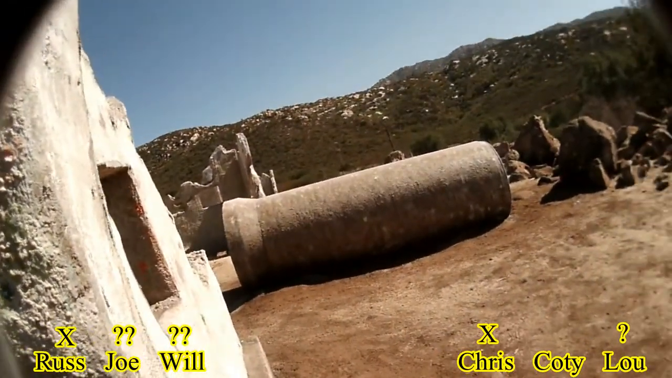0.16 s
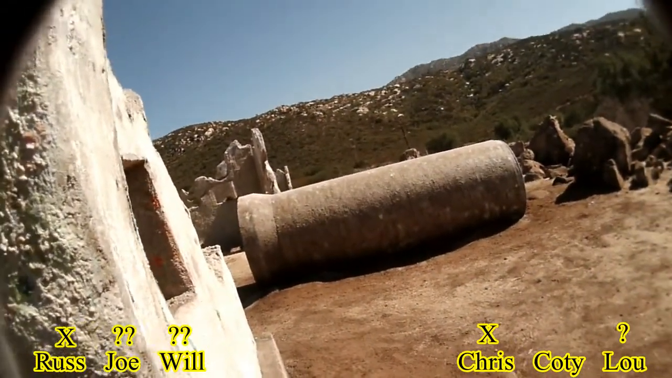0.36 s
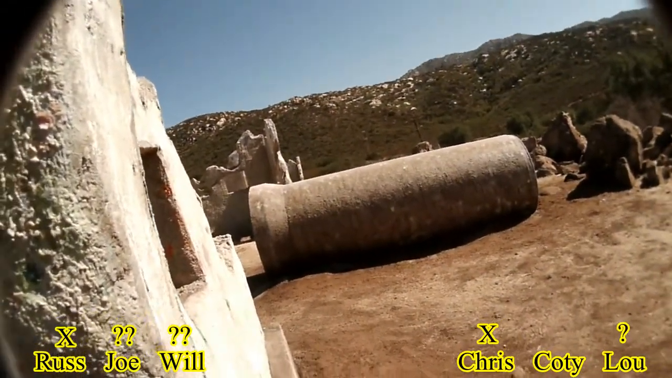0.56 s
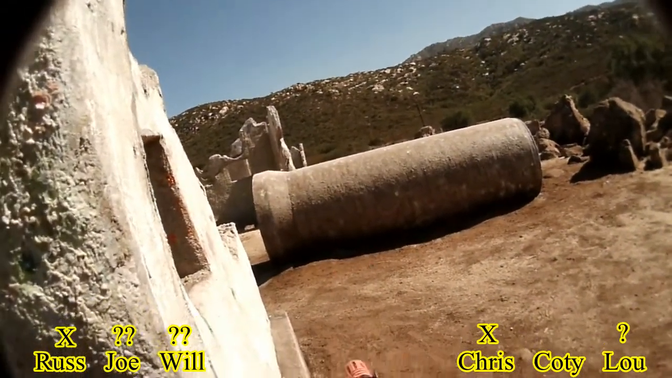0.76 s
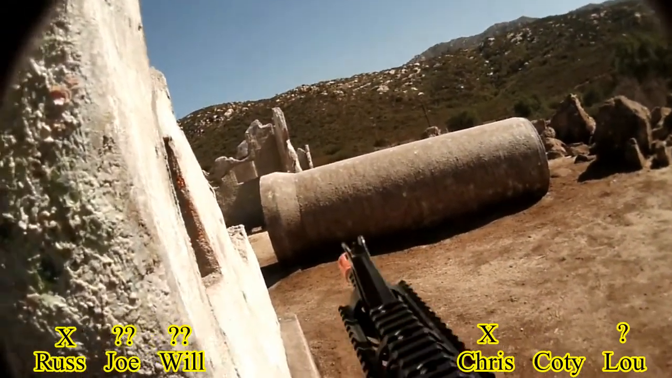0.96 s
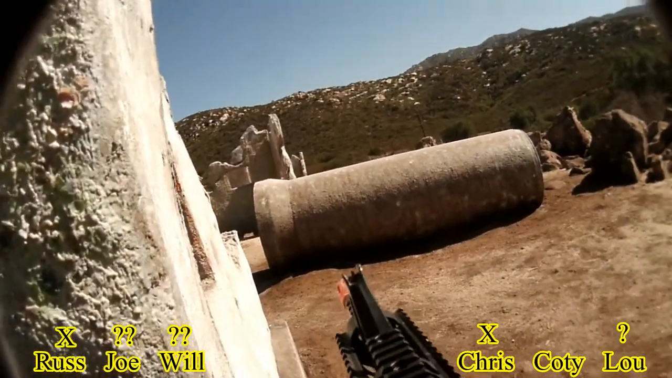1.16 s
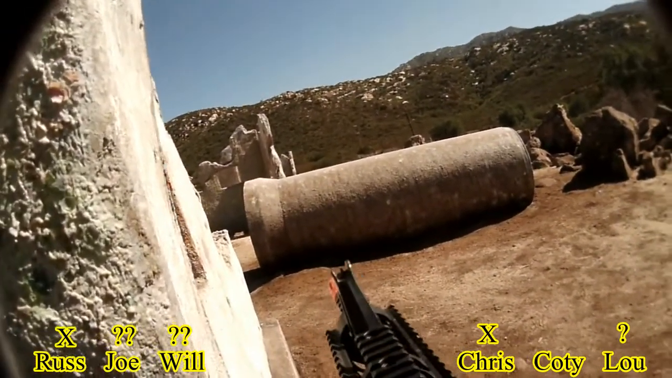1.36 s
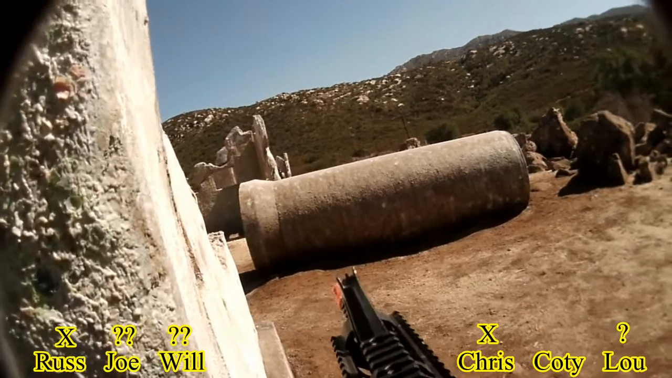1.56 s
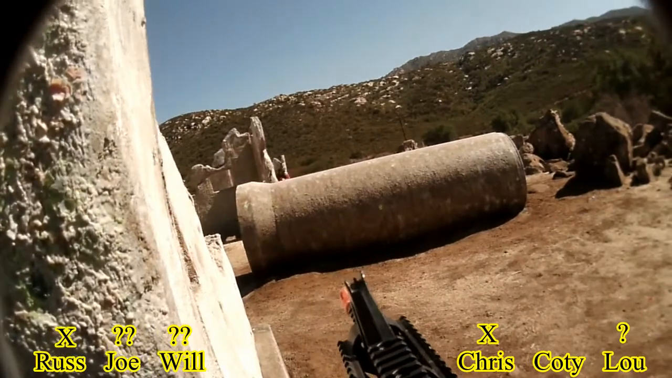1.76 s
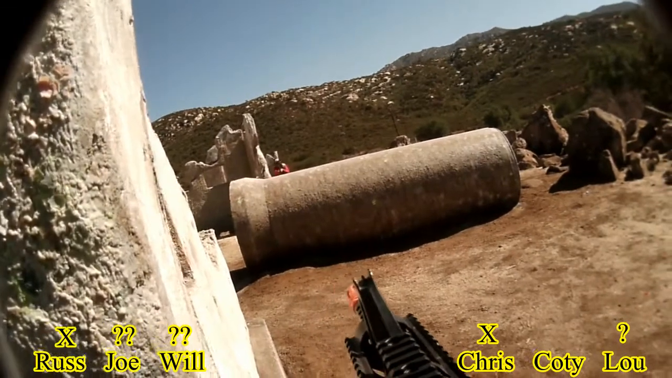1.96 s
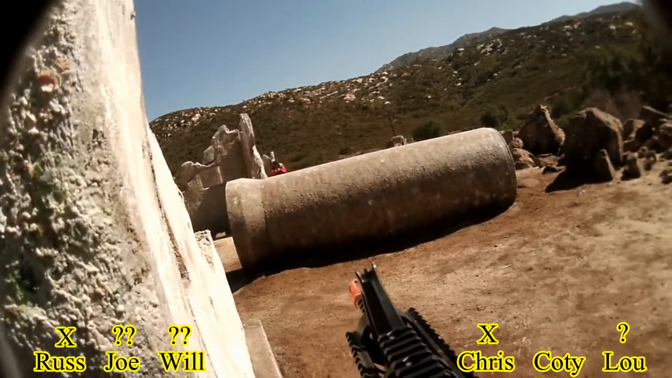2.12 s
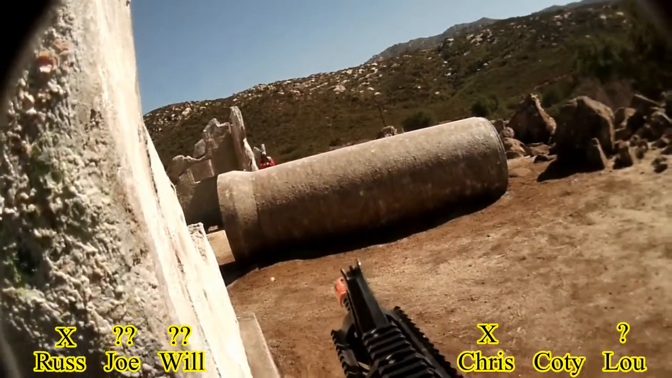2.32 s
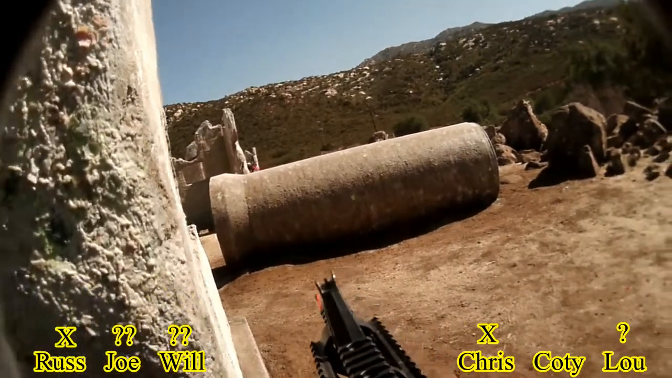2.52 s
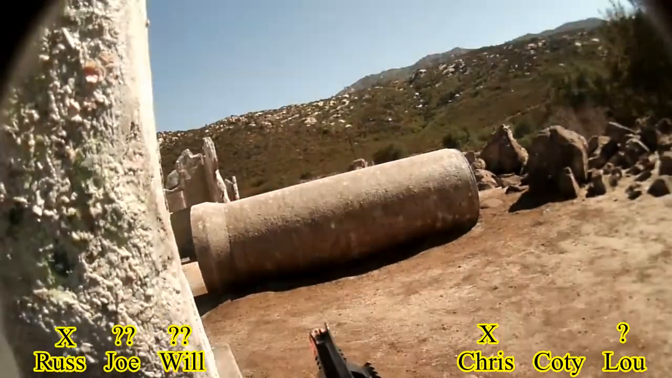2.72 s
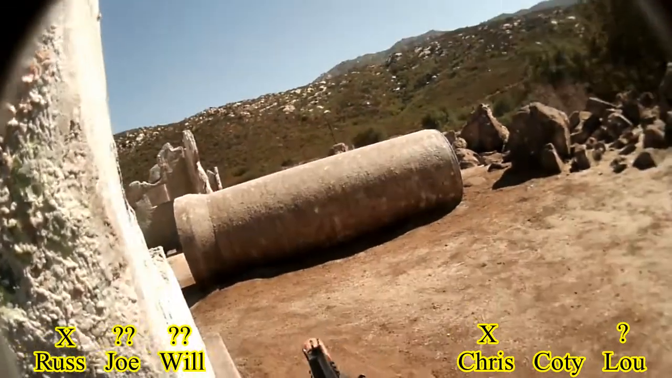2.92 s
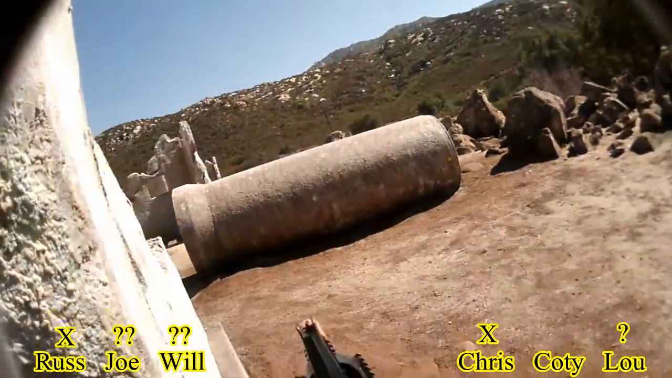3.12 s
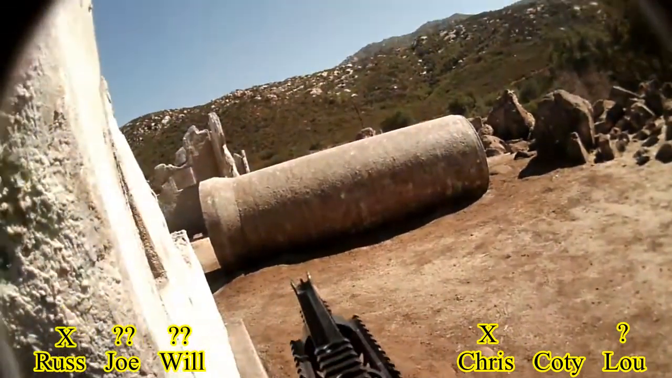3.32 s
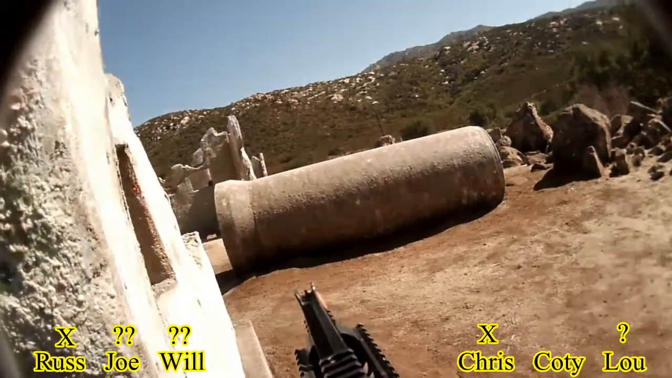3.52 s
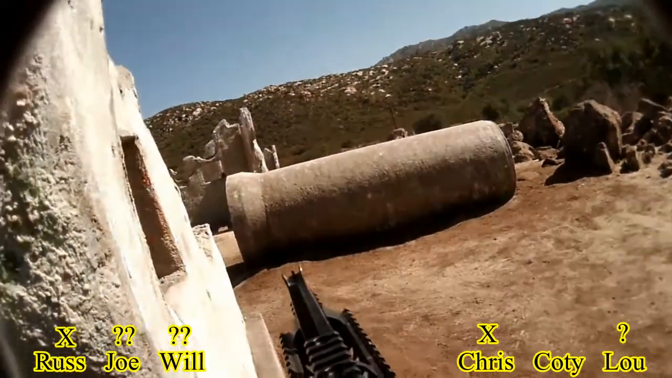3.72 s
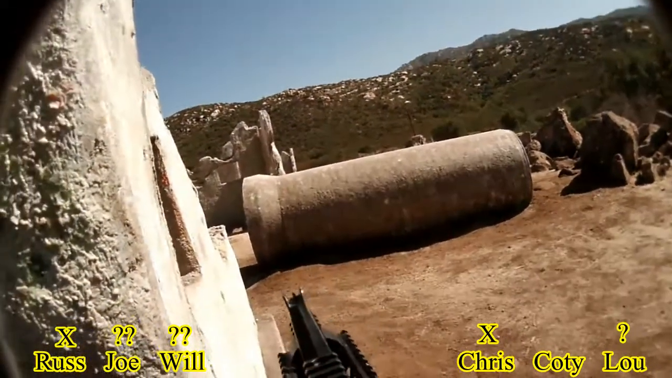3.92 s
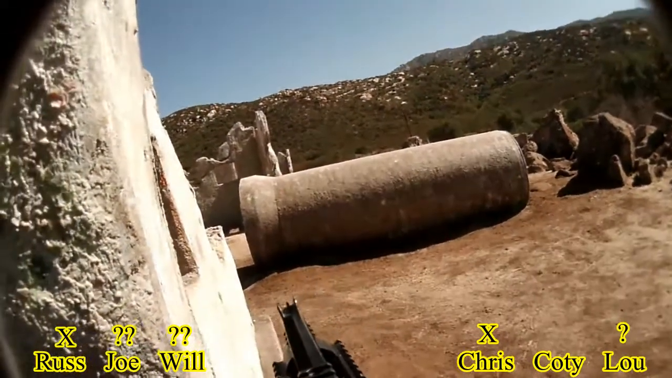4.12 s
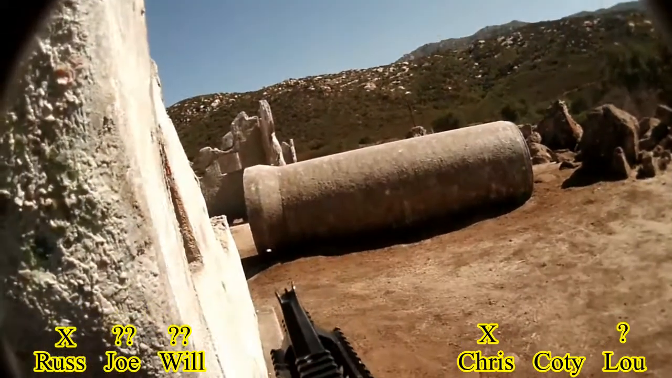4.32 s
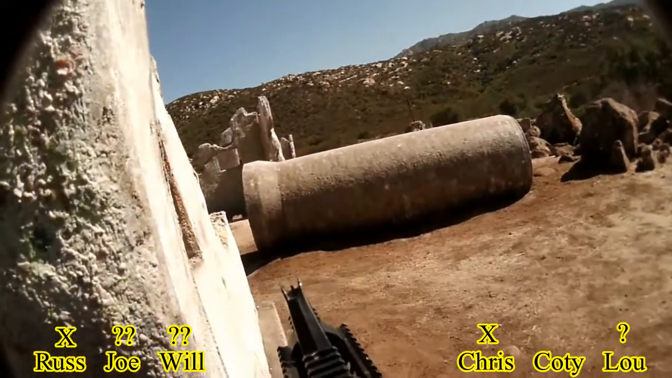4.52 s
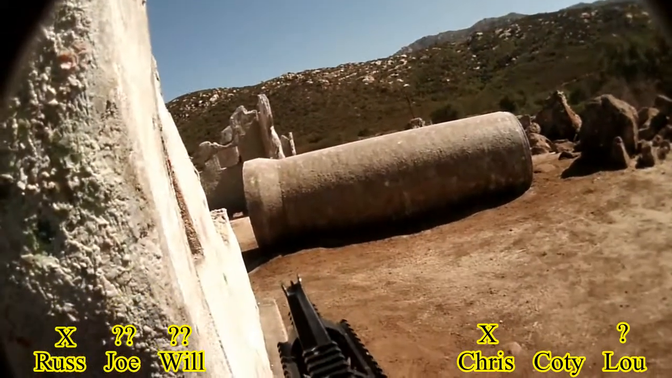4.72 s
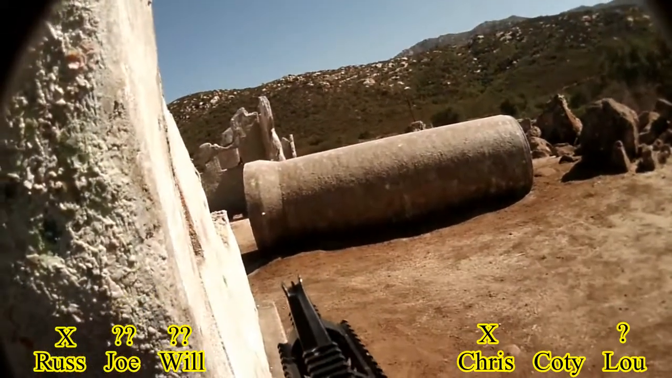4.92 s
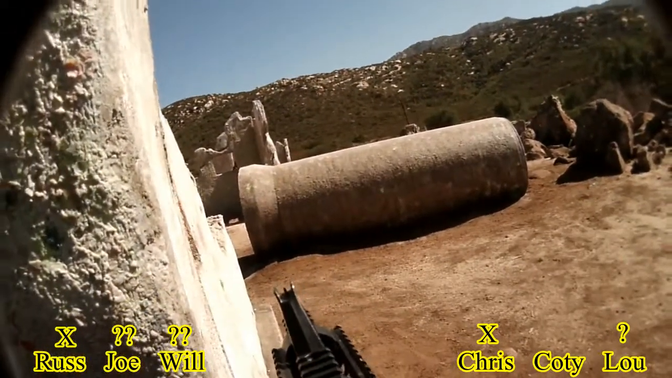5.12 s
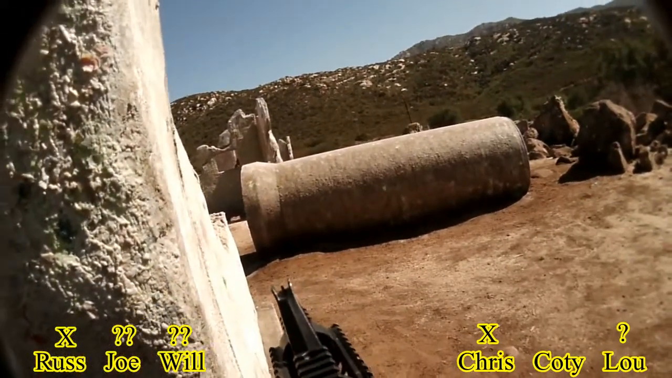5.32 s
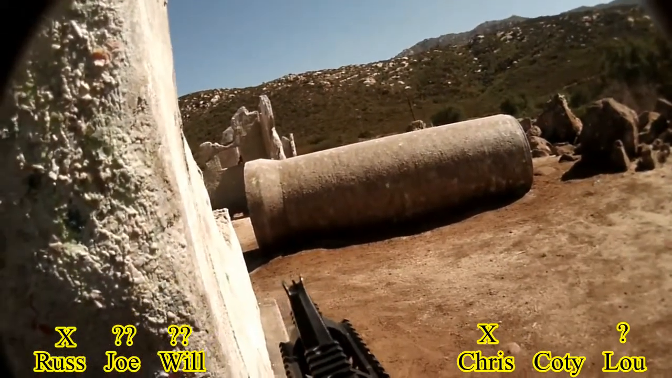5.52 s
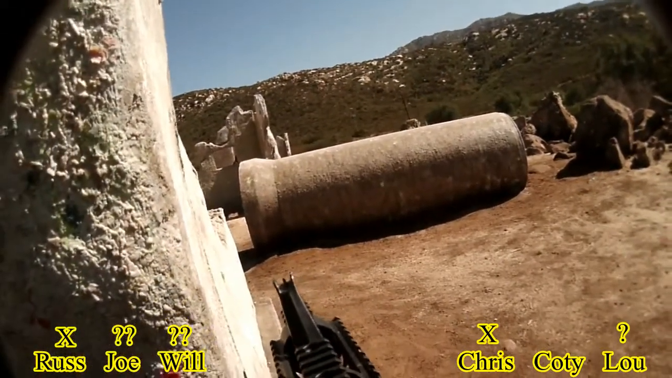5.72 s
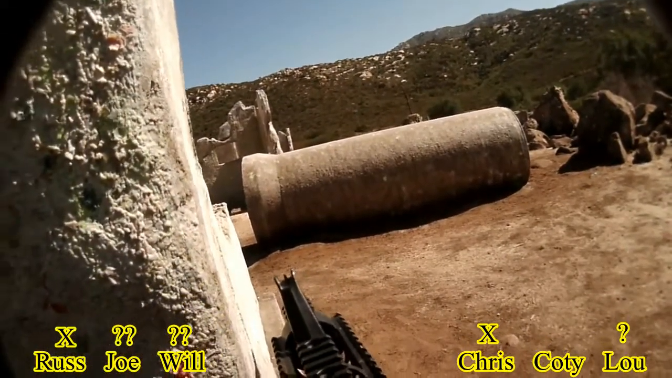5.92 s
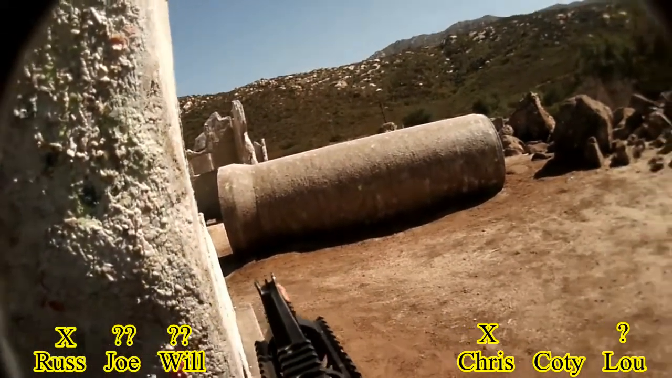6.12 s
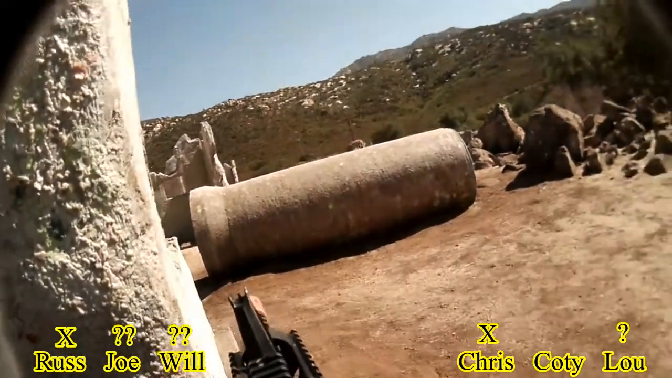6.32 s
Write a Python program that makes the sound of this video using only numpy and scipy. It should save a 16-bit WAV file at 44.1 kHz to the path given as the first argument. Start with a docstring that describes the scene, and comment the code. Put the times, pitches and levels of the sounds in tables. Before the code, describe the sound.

A quiet open field: light wind rumbles on the microphone over faint hiss and a low, distant hum. Clothing rustles softly, with small kit taps around 0.7 and 1.1 seconds. At 1.7 seconds an electric airsoft rifle, very close, fires nine rapid automatic shots, winding down by 2.4 seconds. Each shot is a hard, slightly overloaded piston slam with an air pop, whining, rattling gears and a bright metallic clack. Soft rustling and dull bumps follow from 2.5 to 3.6 seconds. Two-shot bursts come at about 3.8 and 4.2 seconds, then four-shot bursts at 4.8 and 5.4 seconds. Each starts with a brief motor whir and ends with a knock as the gears settle. A light click falls at 5.2 seconds. After 5.8 seconds there are only small clicks, rustling cloth and a bump near 6.1 seconds over the breeze.

```python
"""An open field in a light breeze, a small camera's microphone right beside an electric airsoft rifle.
The rifle fires five automatic bursts. In each cycle whining gears draw the spring, the piston slips
free, pushes its air and slams home, and a metal part clacks back. This close, the slams overload the
microphone. Between bursts the shooter's kit rustles and bumps over wind rumble, hiss and a far hum."""
import sys
import numpy as np
from scipy import signal
from scipy.fft import rfft, irfft, next_fast_len
from scipy.io import wavfile
from scipy.ndimage import uniform_filter1d

SR = 44100
rng = np.random.default_rng(int(sys.argv[2]) if len(sys.argv) > 2 else 0)


def int16_out(signal):
    """Quantize to a 16-bit WAV file."""
    q = np.round(np.clip(np.atleast_2d(signal).T, -1, 1) * 32767)
    wavfile.write(sys.argv[1], SR, q.astype(np.int16))


N = 280766
TIME = np.arange(N) / SR
AGE = np.arange(SR // 10) / SR  # time since a blow [s]

# hiss of open country: (frequency [Hz], relative level [dB])
FIELD_SPECTRUM = [(120, -26), (200, -11), (268, -10), (353, -18), (558, -11), (601, -15.5), (722, -11),
                  (1500, -23.5), (2860, -22), (3560, -26), (8270, -29.5), (13600, -33.5), (16000, -43)]
# wind on the microphone: (frequency [Hz], relative level [dB])
BREEZE_SPECTRUM = [(12, -38), (20, 3.5), (37, 0), (54, -5.5), (80, 0), (107, -3), (134, -1), (166, -10),
                   (268, -12), (348, -17.5), (400, -19.5), (520, -37), (880, -120)]
# strength of the breeze: (time [s], relative level [dB])
GUSTS = [(0, -54), (.9, -49.5), (1.5, -47.5), (2.4, -40), (3.5, -43), (4.05, -43.5), (4.5, -39.5),
         (4.8, -47), (5.3, -45.5), (5.9, -41), (6.37, -46.5)]
# low hum in the distance: (frequency [Hz], level [dB])
HUM_TONES = [(81, -56.5), (138, -63.5)]
# rubbing cloth: (frequency [Hz], relative level [dB])
CLOTH_SPECTRUM = [(150, -20), (450, 1), (750, 6), (1300, -14), (1700, -14), (2400, -11), (3000, -11),
                  (3700, -21.5), (9000, -37), (16000, -45)]
# the shooter's movements: (start [s], length [s], level [dB])
CLOTH_MOVES = [(0.062, 0.17, -49), (0.556, 0.48, -52.5), (2.425, 0.74, -57), (5.815, 0.58, -55),
               (6.082, .06, -44)]
# taps and bumps of rifle and kit: (time [s], level [dB], pitch [Hz], treble [dB], t60 [s])
KIT_BUMPS = [(0.122, -44, 420, 0, .04), (.693, -29, 700, 7.5, 0.026), (1.090, -33.5, 744, -12, 0.029),
             (2.516, -30.5, 216, -6, .056), (2.745, -40.5, 608, 3, 0.053), (3.378, -25, 190, -4, 0.059),
             (3.583, -29, 130.5, -6, 0.0707), (3.623, -28.5, 120, 2, 0.09), (4.455, -32, 248.6, -4, .056),
             (6.121, -25, 574, -22, 0.054)]
# light clicks of trigger and fittings: (time [s], relative level [dB], treble [dB])
FITTING_CLICKS = [(5.228, -23.5, 3), (5.2370, -22.5, -2), (5.832, -31, 23), (6.044, -34, 8),
                  (6.1430, -33, 7)]
# trigger pulls: (gears engage [s], run-up before it [s], first load [dB], motor cut [s],
# run-down after it [s], relative clack level [dB], gears fall back [s])
TRIGGER_PULLS = [(1.6769, .002, -12, 2.340, .07, -1, 2.429),
                 (3.6896, .002, -10.5, 3.923, .028, 1.6, 3.9729),
                 (4.1170, .002, -20, 4.339, 0.037, 1.5, 4.3830),
                 (4.7052, .002, -19.5, 5.010, 0.095, 1.2, 5.1307),
                 (5.3368, .032, -3.5, 5.718, 0.028, 0.4, 5.7647)]
# knocks as the gears engage and fall back, a row for each pull: (relative engage level [dB],
# its treble [dB], relative fall-back level [dB], its treble [dB], pawl tick's lead [s])
PULL_KNOCKS = [(-20, -5, -3.5, -5, .014), (-11, -0.5, -1, -3.5, .013), (-19, 3, -1, -2, .013),
               (-12, -0.5, -10.5, 15, .014), (-4.5, 1.5, 0, -5, .021)]
# the gears run free, catch the piston, slow as the spring tightens, and let go:
# (share of the cycle [0-1], tooth rate at full speed [Hz], relative load [dB])
GEAR_CYCLE = [(0, 819, -2.5), (.2, 870, -4), (.28, 892.5, -3), (.62, 819.2, 0.5), (.82, 735, -1.5),
              (.9, 699.9, -7.5), (1, 681.1, -7.5)]
# whine of the teeth: (multiple of the tooth rate [1], relative level [dB])
WHINE_HARMONICS = [(1, 4), (2, -13.5), (3, -10), (4, -17.5), (5, -36), (6, -26), (8, -19), (9, -21)]
# gear rattle through the shell: (frequency [Hz], relative level [dB])
RATTLE_SPECTRUM = [(90, -18), (380, -18.5), (600, 0.5), (780, 4), (1100, -4), (1500, -10), (2300, -7.5),
                   (2900, -.5), (3450, -16.5), (4600, -14), (5300, -27), (7000, -15.5), (9500, -29.5),
                   (12500, -26.5), (14000, -50)]
# contact noise of a knock: (frequency [Hz], relative level [dB])
KNOCK_SPECTRUM = [(100, -21), (400, -1.5), (750, 5.5), (1300, -3), (2200, -1), (2900, -1.5), (3600, -11.5),
                  (4500, -12.5), (5400, -20), (7500, -13.5), (10000, -23), (15000, -37)]
# chatter of metal on metal: (frequency [Hz], relative level [dB])
CLACK_SPECTRUM = [(200, -18), (800, 7), (1400, -3), (2900, -3.5), (3900, -5), (5300, -15), (6500, -7),
                  (8400, -8.5), (9700, -14.5), (12500, -10.5), (13800, -23.5), (16000, -29)]
# ringing metal of the action: (frequency [Hz], relative level [dB], t60 [s])
ACTION_MODES = [(783, 2.5, 0.046), (2244, 2.5, 0.057), (2826, 1.5, 0.058), (2948, 6.5, 0.044),
                (3870, -10.5, 0.094), (4640, -4, 0.06), (6260, -8.5, 0.064), (6530, -5, .06),
                (7100, -13, 0.017), (8230, -1.5, 0.061), (8730, -7.5, 0.092), (10520, -12, 0.058),
                (11230, -6.5, 0.029), (11460, -12, 0.074), (12000, -21, .07), (12300, -24, 0.054)]
# stock and barrel under the piston's blow: (frequency [Hz], relative level [dB], t60 [s])
BODY_MODES = [(391, 1, 0.015), (583.2, 2, 0.024), (633.7, -11.5, 0.06), (684.7, -6.5, 0.051),
              (955, 4.5, 0.015), (1075, -18.5, 0.085)]
# pop of air at the muzzle: (frequency [Hz], relative level [dB])
MUZZLE_SPECTRUM = [(300, -9), (1000, 8.5), (1900, 9), (3500, 1), (7000, -8), (11000, -29), (16000, -34)]
# piston slams: (time [s])
SLAM_TIMES = [1.6973, 1.7967, 1.8753, 1.9514, 2.0275, 2.1037, 2.1791, 2.2559, 2.332, 3.7846, 3.8747, 4.1896,
              4.2859, 4.7814, 4.877, 4.9573, 5.0444, 5.4209, 5.5065, 5.5866, 5.6657]

CYCLE_S = .076  # from shot to shot at full motor speed
REBOUND_S = .013  # the gears rebound once, this long after falling back


def undb(db):
    """Decibels to gain."""
    return 10 ** (np.asarray(db) / 20)


def unit(x):
    """Scale to rms 1."""
    return x / np.sqrt(np.mean(x ** 2))


def fade(t60):
    """Exponential decay after a blow, 60 dB down in t60 seconds."""
    return np.exp(-np.log(1000) * AGE / t60)


def colour(x, points):
    """Filter x by a curve of (frequency [Hz], level [dB]) points and scale to rms 1."""
    hz, db = np.transpose(points)
    size = next_fast_len(len(x), True)
    bins_hz = np.maximum(np.fft.rfftfreq(size, 1 / SR), 1)
    gain = undb(np.interp(np.log(bins_hz), np.log(hz), db))
    return unit(irfft(rfft(x, size) * gain, size)[:len(x)])


def noise(points, size=len(AGE)):
    """Coloured noise at rms 1."""
    return colour(rng.standard_normal(size), points)


def walk(rate_hz):
    """Smooth random drift at rms 1."""
    step = max(int(SR / rate_hz), 1)
    stairs = np.repeat(rng.standard_normal(N // step + 1), step)
    return unit(uniform_filter1d(stairs, step)[:N])


def ring(modes, detune, scatter_db):
    """Struck modes, swinging in turn with and against the blow; no two blows land quite alike."""
    hz, db, t60 = np.transpose(modes)[..., None]
    tune, force = rng.standard_normal((2, len(modes), 1))
    gain = (-1) ** np.arange(len(modes))[:, None] * undb(db + scatter_db * force)
    return np.sum(gain * fade(t60) * np.sin(2 * np.pi * hz * (1 + detune * tune) * AGE), axis=0)


def add(track, s, sound):
    """Mix a sound in at time s."""
    i = max(int(s * SR), 0)
    track[i:i + len(sound)] += sound[:max(N - i, 0)]


def outdoors(hiss_db=-56.5, breeze_db=-1, buffet_db=.5, waver_db=2):
    """A breeze rumbles on the microphone, over a far wavering hum and the faint hiss of the field."""
    gust_db = np.interp(TIME, *np.transpose(GUSTS))
    breeze = noise(BREEZE_SPECTRUM, N) * undb(breeze_db + gust_db + buffet_db * walk(12))
    hum = np.zeros(N)
    for hz, db in HUM_TONES:
        peak = np.sqrt(2) * undb(db + waver_db * walk(.93))
        wavering_hz = hz * (1 + .02005 * walk(4.5))
        hum += peak * np.sin(2 * np.pi * np.cumsum(wavering_hz) / SR)
    hiss = noise(FIELD_SPECTRUM, N) * undb(hiss_db + .5 * walk(2.8))
    return breeze + hum + hiss


def handling(swell_s=.056, stir_db=-64, crinkle_db=2, contact_s=.00062):
    """Clothes and kit stir faintly all the time, and rustle and bump as the rifle is moved."""
    rub = np.full(N, undb(stir_db))
    for s, length, db in CLOTH_MOVES:
        inside_s = np.minimum(TIME - s, s + length - TIME)
        rub = np.hypot(rub, undb(db) * np.clip(inside_s / swell_s + .5, 0, 1))
    out = noise(CLOTH_SPECTRUM, N) * rub * undb(crinkle_db * walk(60))
    for s, db, hz, treble_db, t60 in KIT_BUMPS:
        spectrum = [(hz / 4, -14), (hz, 0), (2 * hz, treble_db / 2 - 20.5),
                    (4 * hz, treble_db - 21), (6 * hz, treble_db - 41), (16000, -58)]
        add(out, s, undb(db) * noise(spectrum) * fade(t60) * (1 - np.exp(-AGE / contact_s)))
    return out


def slams_between(start, end):
    """The slam times of one burst."""
    return [s for s in SLAM_TIMES if start < s < end]


def cycles():
    """Each slam and the cycle after it: (time [s], excess over CYCLE_S [s], relative clack level [dB])."""
    rows = []
    for engage, *_, clack_db, fall_back in TRIGGER_PULLS:
        slams = slams_between(engage, fall_back)
        extras = np.append(np.diff(slams) - CYCLE_S, 0)
        rows += [(s, extra_s, clack_db) for s, extra_s in zip(slams, extras)]
    return rows


def motor_age():
    """Seconds since the motor last started."""
    since = np.zeros(N)
    for engage, run_up, *_ in TRIGGER_PULLS:
        since = np.where(TIME > engage - run_up, TIME - engage + run_up, since)
    return since


def motor(sag=.12, stall=.3, spin_up_s=.025, full_after_s=.063, settle_s=.046):
    """Gear load and tooth rate: the motor spins up, holds and coasts; the spring drags on each cycle."""
    slack_db, full_db, coast_db = -27.5, 1.05, -16.5
    share, mesh_hz, mesh_db = np.transpose(GEAR_CYCLE)
    load, tooth_hz = np.zeros(N), np.full(N, mesh_hz[0])
    for engage, run_up, first_db, cut, run_down, _, fall_back in TRIGGER_PULLS:
        slams = slams_between(engage, fall_back)
        on, rest = engage - run_up, fall_back + settle_s
        load_s, load_db = np.transpose([
            (on, slack_db), (engage, first_db), (slams[0] + full_after_s, full_db), (cut, full_db),
            (cut + run_down, coast_db), (fall_back + REBOUND_S, coast_db), (rest, slack_db)])
        edges = [on] + slams + [rest]
        for start, end in zip(edges, edges[1:]):
            span = slice(int(start * SR), int(end * SR))
            t = TIME[span]
            drawn = (t - start) / (end - start)
            speed = min(CYCLE_S / (end - start), 1) ** sag  # a long cycle means a slower motor
            spin_up = 1 - stall * np.exp((on - t) / spin_up_s)
            tooth_hz[span] = speed * spin_up * np.interp(drawn, share, mesh_hz)
            load[span] = undb(np.interp(t, load_s, load_db) + np.interp(drawn, share, mesh_db))
    return load, tooth_hz


def pinion(pressure, tooth_hz, pinion_db=-26, ratio=3, lag=.5, gather_s=.11, flutter_db=2):
    """The motor's small gear sings high, gathers speed over the first cycles and sags with each one."""
    hz = ratio * tooth_hz * (1 - lag * np.exp(-motor_age() / gather_s))
    return pressure * undb(pinion_db + flutter_db * walk(90)) * np.sin(2 * np.pi * np.cumsum(hz) / SR)


def tooth_rattle(teeth, grain_db=2, bite=.46, wear_teeth=6, treble_hz=5500, dulling=.73, gather_s=.1):
    """Each tooth scrapes with its own force; wear marks recur every few teeth as a comb of tones."""
    scrape = rng.standard_normal(N) * (1 + bite * np.cos(2 * np.pi * teeth))
    scrape *= undb(grain_db * walk(700))
    wear = signal.resample(rng.standard_normal(240), 2048)
    worn = np.interp(teeth / wear_teeth % 1, np.linspace(0, 1, len(wear)), wear)
    rattle = .62 * colour(scrape, RATTLE_SPECTRUM) + .78 * colour(worn, RATTLE_SPECTRUM)
    # slow teeth scrape softly: the treble comes in as the motor gathers speed
    treble = signal.sosfilt(signal.butter(2, treble_hz, "high", fs=SR, output="sos"), rattle[::-1])
    treble = signal.sosfilt(signal.butter(2, treble_hz, "high", fs=SR, output="sos"), treble[::-1])
    return rattle - dulling * np.exp(-motor_age() / gather_s) * treble


def gears(whine_db=-20, rattle_db=-18, flutter_db=2):
    """Meshing teeth whine and rattle through the shell."""
    load, tooth_hz = motor()
    pressure = load * np.sqrt(np.minimum(load, 1))  # teeth only sing when pressed hard together
    teeth = np.cumsum(tooth_hz * (1 + .004 * walk(120))) / SR  # count of teeth passed
    whine = unit(sum(undb(db + flutter_db * walk(60)) * np.sin(2 * np.pi * k * teeth)
                     for k, db in WHINE_HARMONICS))
    rattle = load * undb(rattle_db) * tooth_rattle(teeth)
    return pressure * undb(whine_db) * whine + rattle + pinion(pressure, tooth_hz)


def gear_blows(catch_s=.0175, catch_drag=.62, catch_db=.7, catch_treble_db=2,
               pawl_db=-9, pawl_treble_db=12, rebound_db=-12):
    """Gears catch the piston, engage and fall back on the pawl: (time [s], level [dB], treble [dB])."""
    rows = []
    for s, extra_s, _ in cycles():
        powered = any(engage < s < cut for engage, _, _, cut, *_ in TRIGGER_PULLS)
        if powered:  # the catch comes later in a slow cycle
            rows.append((s + catch_s + catch_drag * extra_s, catch_db, catch_treble_db))
    for (engage, *_, fall_back), pull_knocks in zip(TRIGGER_PULLS, PULL_KNOCKS):
        engage_db, engage_treble_db, fall_db, fall_treble_db, pawl_s = pull_knocks
        rows += [(engage, engage_db, engage_treble_db),
                 (fall_back - pawl_s, fall_db + pawl_db, pawl_treble_db),
                 (fall_back, fall_db, fall_treble_db),
                 (fall_back + REBOUND_S, fall_db + rebound_db, fall_treble_db)]
    return rows


def knocks(knock_db=-11, knock_t60=.036, graze_db=-7, graze_t60=.011, seat_s=.001202):
    """Short blows in the gearbox and fittings: the parts graze, then seat."""
    out = np.zeros(N)
    for s, db, treble_db in gear_blows() + FITTING_CLICKS:
        spectrum = [(hz, band_db + 2 * treble_db * hz / (hz + 3000)) for hz, band_db in KNOCK_SPECTRUM]
        add(out, s, undb(db + knock_db + graze_db) * noise(spectrum) * fade(graze_t60))
        add(out, s + seat_s, undb(db + knock_db) * noise(spectrum) * fade(knock_t60))
    return out


def action(clack_s=.0484, drag=.05, ring_db=-19, chatter_db=-10, chatter_t60=.059, seat_s=.00031):
    """Metal clacks back on metal after each slam, later in a slow cycle: bright chatter, short ring."""
    out = np.zeros(N)
    attack = 1 - np.exp(-AGE / seat_s)
    for s, extra_s, db in cycles():
        metal = undb(ring_db) * ring(ACTION_MODES, detune=.007, scatter_db=2.5)
        chatter = undb(chatter_db) * noise(CLACK_SPECTRUM) * fade(chatter_t60)
        add(out, s + clack_s + drag * extra_s, undb(db) * (metal + chatter) * attack)
    return out


def piston(release_s=.0098, slip_db=-16, jolt_db=-6, jolt_hz=480, push_hz=148, push_db=-10,
           slam_db=3.5, shake_db=-19, pop_db=-6, pop_s=.000987):
    """The piston slips off the gear, pushes one swing of air and slams home; air pops at the muzzle."""
    out = np.zeros(N)
    stroke = np.minimum(AGE * push_hz, 1)
    swing = np.sin(2 * np.pi * stroke ** 1.49)  # quickens with the piston
    push = undb(push_db) * swing * np.sqrt(np.minimum(2 * stroke, 1))
    jolt = -undb(jolt_db) * np.sin(2 * np.pi * jolt_hz * AGE) * fade(t60=.006)
    for s in SLAM_TIMES:
        slip = undb(slip_db) * noise(KNOCK_SPECTRUM) * fade(t60=.034)
        body = ring(BODY_MODES, detune=.004, scatter_db=.5)
        shake = undb(shake_db) * noise(KNOCK_SPECTRUM) * fade(t60=.12)
        pop = undb(pop_db) * noise(MUZZLE_SPECTRUM) * fade(t60=.02)
        add(out, s - release_s, slip + jolt)
        add(out, s - 1 / push_hz, push)
        add(out, s, undb(slam_db) * (body + shake))
        add(out, s + pop_s, undb(slam_db) * pop)
    return out


def scene():
    """The rifle close up and the field behind it, in one channel."""
    return (piston() + action() + knocks() + gears() + handling() + outdoors())[None]


def record(dry, limit=.53, knee=4, top_hz=15900):
    """The overloaded microphone flattens the loudest swings, and the top of the treble is cut."""
    flattened = dry / (1 + np.abs(dry / limit) ** knee) ** (1 / knee)
    return signal.sosfilt(signal.ellip(10, .2, 80, top_hz, fs=SR, output="sos"), flattened)


dry = scene()
out = record(dry)
int16_out(out)
```